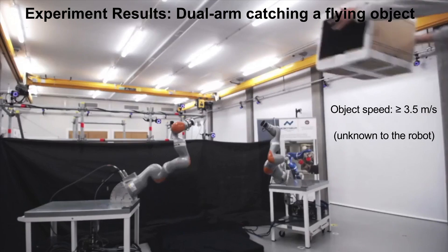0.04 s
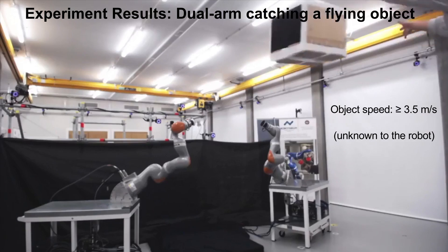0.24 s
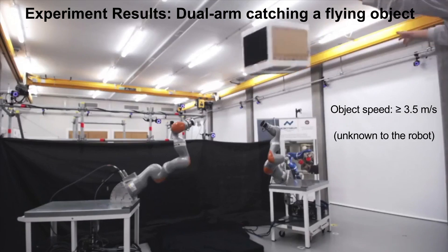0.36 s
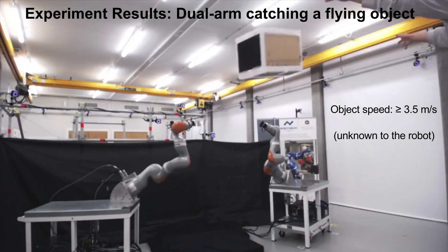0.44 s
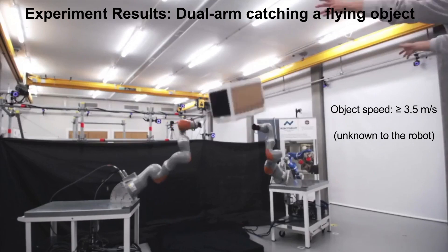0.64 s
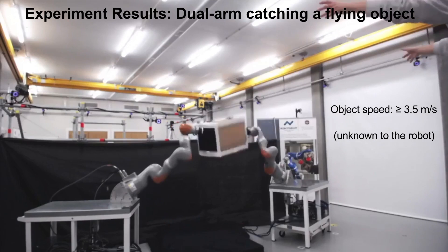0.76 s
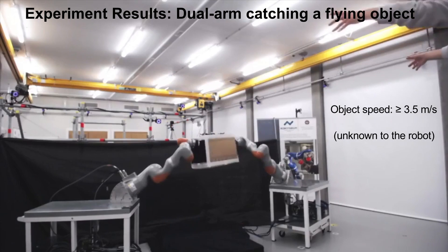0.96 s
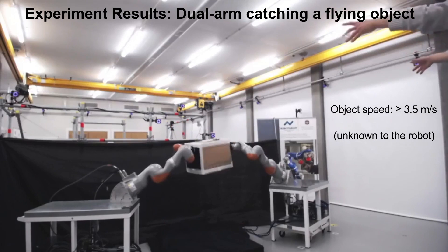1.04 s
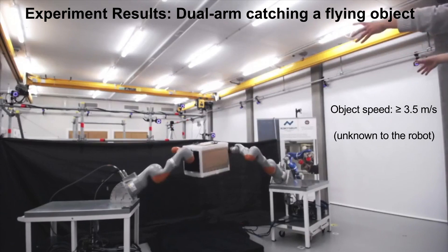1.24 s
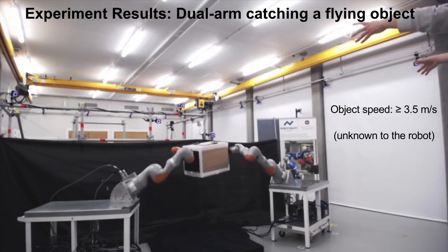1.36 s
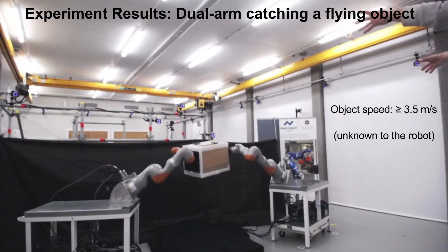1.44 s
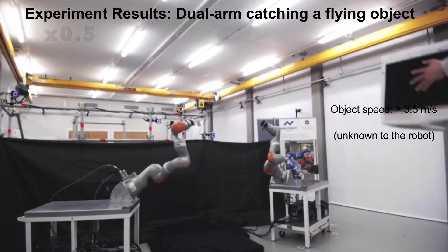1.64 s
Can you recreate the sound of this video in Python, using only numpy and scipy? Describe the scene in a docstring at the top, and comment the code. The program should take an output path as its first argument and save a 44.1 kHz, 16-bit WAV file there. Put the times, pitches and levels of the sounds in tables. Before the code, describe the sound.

A heavy cardboard box bumps and scrapes against two metal robot arms from about 0.25 seconds, landing with one dull thud near 0.4 seconds. The arms ring faintly and the lab echoes as it settles. A small tick follows at 0.9 seconds. Fans and motors hum quietly behind with a thin whine, cut out briefly around 1.5 seconds and return an octave lower.

```python
"""A heavy cardboard box is caught between two metal robot arms, heard in stereo in a hard-walled lab.
It bumps and scrapes along the pads, lands with one dull thud and settles; a small tick follows.
Each blow booms in the box, knocks its panels and rings the arms; the walls echo it to the microphone.
Fans and motor drives run behind it; near the end all cuts out and the hum returns an octave lower."""
import sys
import numpy as np
from scipy import signal
from scipy.fft import rfft, irfft
from scipy.io import wavfile
from scipy.ndimage import uniform_filter1d

SR = 44100
rng = np.random.default_rng(int(sys.argv[2]) if len(sys.argv) > 2 else 0)


def pcm_store(signal):
    """Save signal as 16-bit PCM."""
    levels = np.round(np.clip(np.atleast_2d(signal), -1, 1) * 32767)
    wavfile.write(sys.argv[1], SR, levels.astype(np.int16).T)


N = 74970
T = np.arange(N) / SR

# Stereo width of the catch and of the machines. Each row: frequency in Hz, side minus mid in dB.
CATCH_WIDTH = [(30, -29.5), (80, -32), (170, -20), (350, -23.5), (700, -17), (1290, -1), (2370, 0.5),
               (4380, 1.5), (8090, -8.5), (11000, -3), (14000, -17)]
MACHINE_WIDTH = [(30, -14), (110, -24), (240, -14), (470, -15), (950, -8), (1890, 3.5), (3760, -3),
                 (7490, -3), (14000, -22)]
# Fan rush before the catch, after it and after the silence. Each row: frequency in Hz, relative dB.
FANS_BEFORE = [(20, -6), (36, -24.5), (70, -17.5), (111, -4), (169, -4), (421, -6), (693, -16),
               (1310, -10.5), (1750, -26), (2600, -21), (7300, -36), (9000, -40.5), (15000, -60.5)]
FANS_AFTER = [(20, -7), (33, -2), (54, -19), (90, -9.5), (125, -14), (205, -7.5), (310, -10.5),
              (500, -10.5), (650, -12), (1100, -17.5), (1380, -16.5), (1600, -25.5), (2300, -30),
              (5500, -41), (7300, -29.5), (9200, -48), (14500, -51)]
FANS_LOW = [(20, -7.5), (60, -1), (170, -3.5), (240, -10.5), (680, -13), (800, -25), (1050, -29),
            (1400, -19.5), (2700, -31.5), (3700, -32.5), (4800, -47.5), (7200, -57), (8000, -78.5)]
# Motor hum. Each row: pitch in Hz, line width in Hz, level in dB, start and end in seconds.
MOTOR_TONES = [(109.4, 24.6, -49.5, -.1, 0.73), (203, 1.9, -52.5, 1.11, 1.8), (1273, 104, -54, 1.18, 1.426)]
# Reverberation of the lab. Each row: frequency in Hz, seconds to fall by 60 dB.
ROOM_T60 = [(40, 0.73), (150, 1.12), (350, 0.92), (1000, 1.05), (2500, 0.93), (5500, 0.78), (8000, 0.43),
            (14000, 0.58)]
# Echoes off nearby surfaces. Each row: left and right delay in seconds, gain.
ECHOES = [(.0068, .0069, 0.24), (0.0122, .0133, 0.17), (0.028, .028, .2)]

# Tone colours of the noises of the catch. Each row: frequency in Hz, relative level in dB.
RUMBLE_COLOUR = [(15, -10.5), (27, 4.5), (42, -20), (80, -4.5), (130, -18), (400, -56.5), (2000, -100)]
SCRAPE_COLOUR = [(40, -21.5), (150, 4.5), (350, 13.5), (800, 9), (1600, -1.5), (3000, -6), (5500, -9),
                 (9000, -16.5), (13000, -34), (15000, -43.5)]
TICK_COLOUR = [(300, -22), (2000, -26), (3100, -1.5), (4400, 4), (5500, 2.5), (7200, -4), (8500, -12),
               (15000, -36)]
RASP_COLOUR = [(300, -34), (4000, -25), (5500, -2), (6800, 8), (7600, -11), (8600, -11), (15000, -38)]
SLAP_COLOUR = [(40, -23), (150, -24), (280, -13), (450, 1.5), (610, -5), (850, -0.5), (1150, 2.5),
               (1500, -10.5), (2600, -9.5), (5500, -28), (9000, -31.5), (15000, -60)]
CRACKLE_COLOUR = [(200, -9.5), (900, 3.5), (2000, 1.5), (3500, 3.5), (5600, 2), (7000, -3),
                  (11000, -11.5), (13500, -28.5), (15000, -44.5)]
# Course of the load's rumble and of the slide on the pads. Each row: time in seconds, level in dB.
RUMBLE_LEVELS = [(.23, -47), (.255, -44), (.29, -30), (.35, -34), (.39, -44), (.5, -35), (.62, -40.5),
                 (.8, -45.5), (.95, -58)]
SLIDE_LEVELS = [(.22, -48.5), (.255, -33.5), (.285, -33.5), (.30, -34.5), (.345, -29.5), (.39, -30.5),
                (.43, -24.5), (.49, -35.5), (.56, -35)]
# Crackles of the box's skin and ticks of the tightening grip. Each row: start in seconds, level in dB.
CRACKLES = [(.2983, -31), (.305, -35.5), (.3262, -30), (.333, -39.5), (.343, -34.5), (.356, -36.5),
            (.367, -35.5), (.3958, -21.5), (.4012, -22.5), (.409, -21.5), (.417, -31.5), (.4305, -27),
            (.447, -45), (.475, -33), (.496, -43)]
GRIP_TICKS = [(.8955, -39.5), (.9025, -42), (.9095, -51), (1.137, -57)]
# Modes of the air in the box, its panels and the metal arms, at relative pitch 1.
# Each row: frequency in Hz, relative level in dB, seconds to fall by 60 dB.
AIR_MODES = [(147.5, 0.5, 0.073), (120.7, -7, 0.048)]
PANEL_MODES = [(288.5, -2.5, 0.064), (343.7, -7.5, 0.064), (242.7, -13.5, 0.043), (389, -16.5, 0.12),
               (443, -20.5, 0.05), (282.2, -26.5, 0.5)]
ARM_MODES = [(543, -15, 0.32), (697.7, -8.5, 0.11), (742, -7, 0.26), (772.3, -4, 0.16), (793.8, -5, 0.098),
             (868.3, -3.5, 0.14), (902.5, -6.5, 0.2), (987, -13, 0.57), (1195, -15.5, 0.062),
             (1248, -21.5, 0.55)]
# Blows on the box. Each row: start in seconds, boom, knock, slap and arm ring in dB, relative pitch.
BLOWS = [(0.2453, -32.5, -14, -42, -78, 1.0), (.257, -50, -16.5, -38, -62, 1.06),
         (.27, -22.5, -32, -41, -40, 1.02), (.302, -22.5, -26, -44, -52, .94),
         (0.3422, -47, -28, -19.5, -33.5, 0.79), (0.37, -45, -21.5, -43.5, -44, 0.96),
         (.396, -43.5, -18, -26, -44.5, 0.85), (0.4156, -22, -5, -15.5, -16, 1),
         (0.4291, -42, -19.5, -13, -23, 1.01), (0.4431, -34, -31.5, -22.5, -27.5, 1),
         (0.4663, -15.5, -31, -27.5, -29, .98), (.514, -41, -22, -39, -48, 1),
         (.536, -34, -30.5, -32, -54, 0.97), (.648, -53, -50, -32.5, -46, 1.03)]

WHINE_HZ, WHINE_WIDTH_HZ, FLUTTER_HZ, DROPOUT_PERIOD_S = 7996, 11, 265, 0.038  # at speed 1
GRAINS_PER_S, GRAIN_SPREAD_DB = 2600, 3.5
CUT_S, RESUME_S, FADE_S = 1.538, 1.593, 0.029


def amp(db):
    """Decibels to gain."""
    return 10 ** (np.asarray(db) / 20)


def unit(x):
    """Scales to rms 1."""
    return x / np.sqrt(np.mean(x ** 2) + 1e-20)


def read(points, hz):
    """Reads a table on a log-frequency axis."""
    freqs, values = np.transpose(points)
    return np.interp(np.log(hz + 1), np.log(freqs + 1), values)


def colour(x, spectrum):
    """Filters by a spectrum in dB."""
    return irfft(rfft(x) * amp(read(spectrum, np.fft.rfftfreq(N, 1 / SR))), N)


def spread(pair, width=CATCH_WIDTH):
    """Two unrelated signals become left and right at the microphone, alike in the bass."""
    side_gain = amp(read(width, np.fft.rfftfreq(N, 1 / SR)))
    mid, side = rfft(pair) / np.sqrt(1 + side_gain ** 2)
    return irfft(np.array([mid + side_gain * side, mid - side_gain * side]), N)


def noise(spectrum, width=CATCH_WIDTH):
    """Coloured stereo noise of rms 1."""
    return unit(colour(spread(rng.standard_normal((2, N)), width), spectrum))


def tone(hz, width_hz):
    """A stereo tone that wavers as its phase drifts."""
    drift = np.cumsum(rng.standard_normal((2, N)), 1) * np.sqrt(2 * np.pi * width_hz / SR)
    drift = uniform_filter1d(drift, size=200, axis=1)
    phase = 2 * np.pi * (hz * T + rng.random((2, 1))) + drift
    return unit(spread(np.sin(phase), MACHINE_WIDTH))


def gate(start, end, fade):
    """On between two times, with soft ramps."""
    ramps = np.clip((T - start) / fade, 0, 1) * np.clip((end - T) / fade, 0, 1)
    return np.sin(np.pi / 2 * ramps) ** 2


def swell(curve):
    """Gain along a curve of seconds and dB, silent outside it."""
    return amp(np.interp(T, *np.transpose(curve), left=-np.inf, right=-np.inf))


def bursts(rows, rise_s, decay_s):
    """Envelope of short bursts, added in power."""
    power = 0
    for start, db in rows:
        age = np.maximum(T - start, 0)
        power += (amp(db) * np.minimum(age / rise_s, 1) * np.exp(-age / decay_s)) ** 2
    return np.sqrt(power)


def drive_whine(speed):
    """The drives' high whine flutters and drops out at a steady pace; speed scales pitch and pace."""
    flutter = 1 + 0.98 * np.cos(2 * np.pi * FLUTTER_HZ * speed * T)
    cycles_from_dropout = abs((T * speed / DROPOUT_PERIOD_S) % 1 - 0.5)
    dropouts = np.minimum(cycles_from_dropout / 0.14, 1) ** 2
    return unit(tone(WHINE_HZ * speed, WHINE_WIDTH_HZ * speed) * flutter * dropouts)


def machines():
    """Room tone of fans, motors and drives; after the catch the rush is quieter, the whine 1 dB up."""
    after = np.clip((T - 0.4) / 0.48, 0, 1)
    fans = amp(-40) * noise(FANS_BEFORE, MACHINE_WIDTH) * np.sqrt(1 - after)
    fans += amp(-48) * noise(FANS_AFTER, MACHINE_WIDTH) * np.sqrt(after)
    hum = sum(amp(db) * tone(hz, width) * gate(start, end, fade=0.12)
              for hz, width, db, start, end in MOTOR_TONES)
    return fans + hum + amp(-65 + after) * drive_whine(speed=0.99)


def low_machines():
    """Fan rush and drive whine, an octave lower."""
    return amp(-41) * noise(FANS_LOW, MACHINE_WIDTH) + amp(-63) * drive_whine(speed=0.5)


def room_tail(rise_s=0.019):
    """One diffuse tail off the hard walls, dying faster in the treble."""
    diffuse = spread(rng.choice([-1., 1.], (2, N)))
    hz, age, bands = signal.stft(diffuse, SR, nperseg=512)
    decay = amp(-60 * age / read(ROOM_T60, hz)[:, None])
    tail = signal.istft(bands * decay, SR, nperseg=512)[1][:, :N]
    return tail * np.minimum(T / rise_s, 1) * np.sqrt(2 * np.log(1000) / SR)


def lab(layers, tails=3, crossfade_s=0.07):
    """Layers of (sound, reverb send in dB) reach the microphone directly, as echoes and as tails."""
    direct = sum(sound for sound, _ in layers)
    send = sum(sound * amp(send_db) for sound, send_db in layers)
    early = late = 0
    for *delays, gain in ECHOES:
        delayed = [np.interp(T - delay, T, channel, left=0) for delay, channel in zip(delays, direct)]
        early += gain * np.array(delayed)
    for k in range(tails):  # the tails crossfade in turn, keeping the reverberation smooth and diffuse
        share = np.sqrt(2 / tails) * np.cos(np.pi * (T / crossfade_s + k / tails))
        late += signal.fftconvolve(send * share, room_tail(), axes=1)[:, :N]
    return direct + early + late


def load_rumble():
    """The swaying load rumbles deep under the catch."""
    return noise(RUMBLE_COLOUR) * swell(RUMBLE_LEVELS)


def pad_friction():
    """Cardboard slides grainily and crackles; the grip ticks tight and a slipping pad rasps."""
    grains = rng.standard_normal((2, N)) * (rng.random(N) < GRAINS_PER_S / SR)
    grains *= amp(GRAIN_SPREAD_DB * np.minimum(rng.exponential(1, N), 2))
    slide = unit(colour(spread(grains), SCRAPE_COLOUR)) * swell(SLIDE_LEVELS)
    crackles = noise(CRACKLE_COLOUR) * bursts(CRACKLES, rise_s=0.0012, decay_s=0.007)
    ticks = noise(TICK_COLOUR) * bursts(GRIP_TICKS, rise_s=0.00058, decay_s=0.0025)
    rasp = noise(RASP_COLOUR) * bursts([(0.901, -48.5)], rise_s=0.0022, decay_s=0.026)
    return slide + crackles + ticks + rasp


def ring(modes, starts, levels_db, pitches, rise_s=0.0031):
    """Damped modes set going by a series of blows, each at its own relative pitch."""
    age = T[:SR // 2]
    response = sum(amp(db - 60 * age / t60) * np.sin(2 * np.pi * hz * age) for hz, db, t60 in modes)
    response *= np.minimum(age / rise_s, 1)
    return sum(amp(db) * np.interp((T - start) * pitch, age, response, left=0, right=0)
               for start, db, pitch in zip(starts, levels_db, pitches))


def box_blows():
    """Each blow sounds the box's air, panels and skin and rings the arms; the grip shifts the pitch."""
    starts, boom_db, knock_db, slap_db, arms_db, pitches = np.transpose(BLOWS)
    boom = ring(AIR_MODES, starts, boom_db, pitches)
    knock = -ring(PANEL_MODES, starts, knock_db, pitches)
    arms = -ring(ARM_MODES, starts, arms_db, pitches)
    slap = noise(SLAP_COLOUR) * bursts(zip(starts, slap_db), rise_s=0.00093, decay_s=0.0063)
    return boom, knock, arms, slap


def scene():
    """The catch in front of the room tone, a short silence, then the lower hum."""
    boom, knock, arms, slap = box_blows()
    catch = lab([(boom, -6), (knock, 0.5), (arms, -6), (slap, 4), (pad_friction(), -0.5)])
    opening = (catch + load_rumble() + machines()) * gate(-1, CUT_S, FADE_S)
    return opening + low_machines() * gate(RESUME_S, 2, FADE_S)


def record(dry, edge_hz=15500):
    """The microphone chain cuts off the highest treble."""
    lowpass = signal.firwin(511, edge_hz, window=("kaiser", 9), fs=SR)
    return signal.oaconvolve(dry, lowpass[None], "same")


dry = scene()
out = record(dry)
pcm_store(out)
```